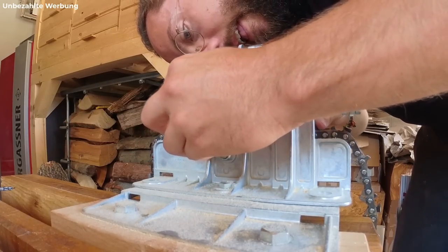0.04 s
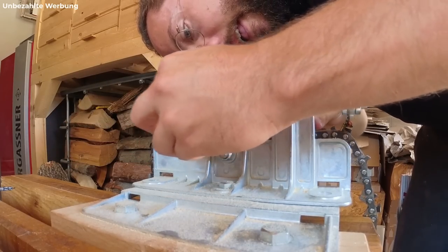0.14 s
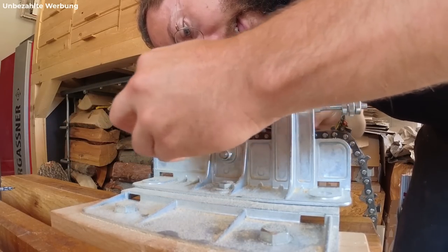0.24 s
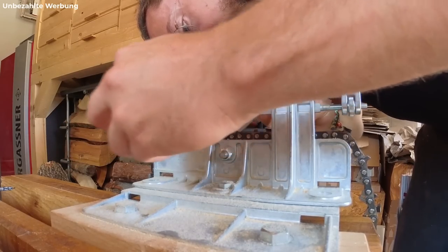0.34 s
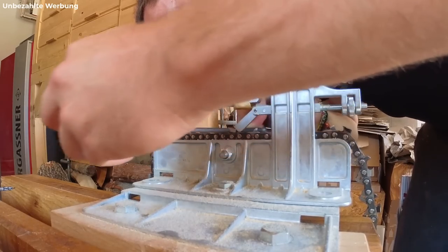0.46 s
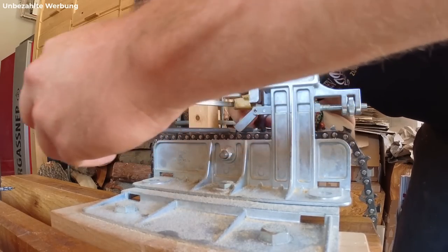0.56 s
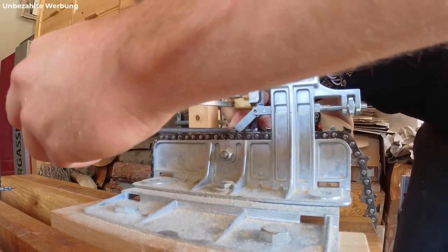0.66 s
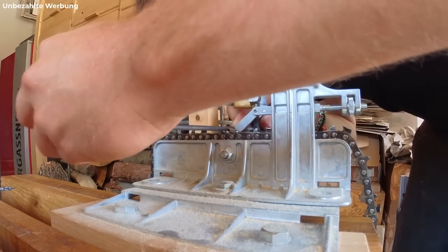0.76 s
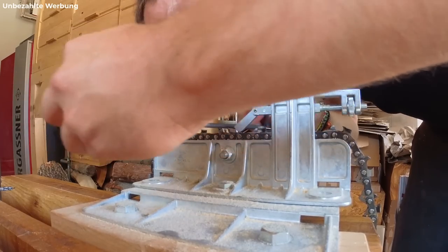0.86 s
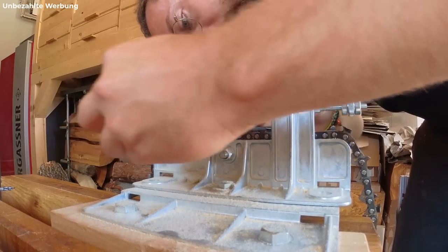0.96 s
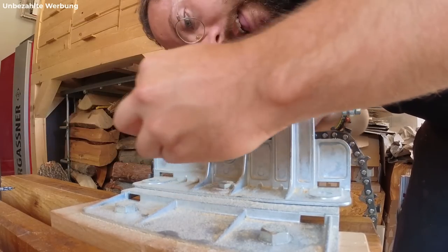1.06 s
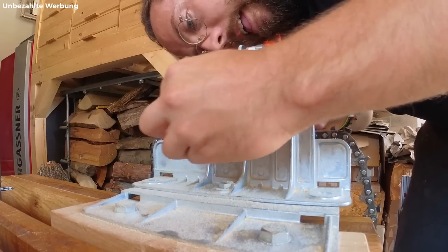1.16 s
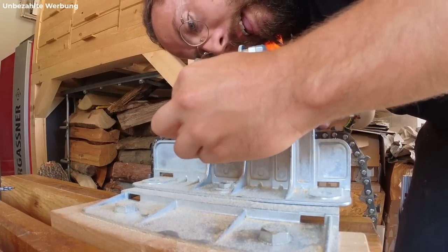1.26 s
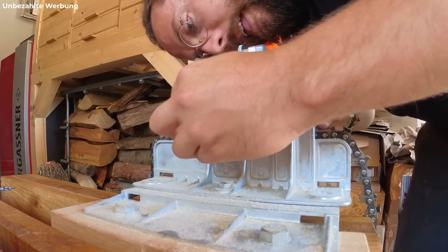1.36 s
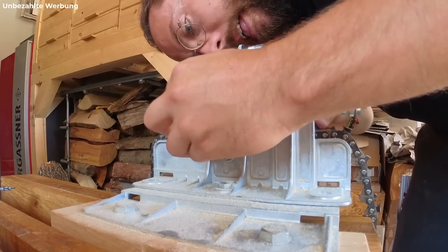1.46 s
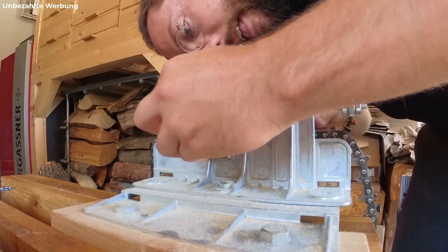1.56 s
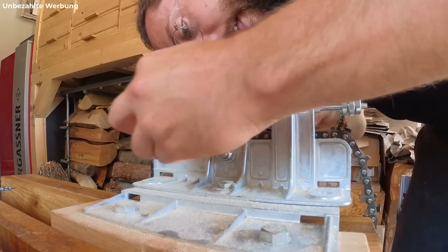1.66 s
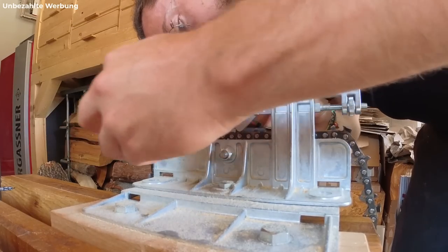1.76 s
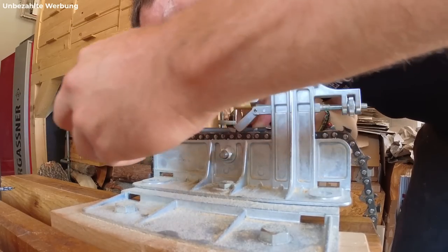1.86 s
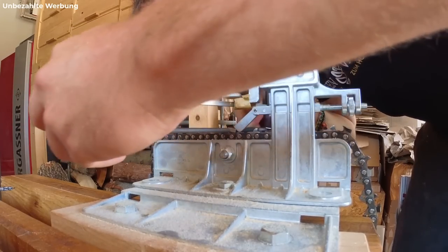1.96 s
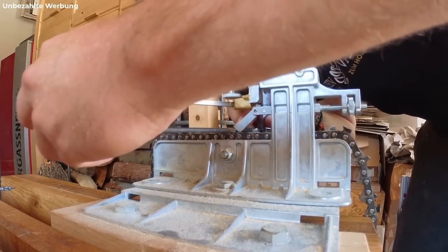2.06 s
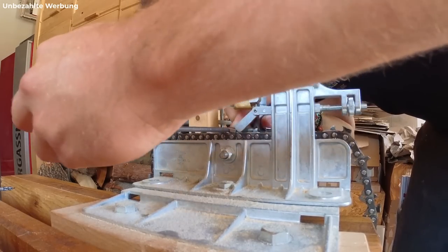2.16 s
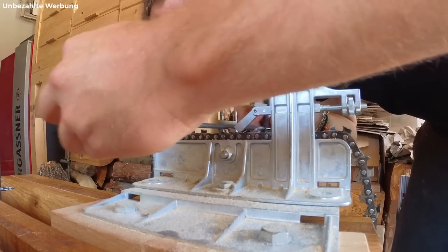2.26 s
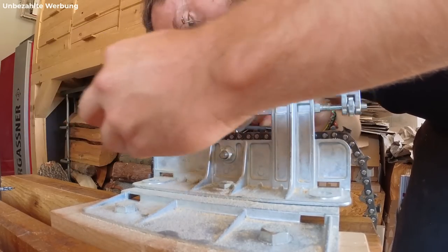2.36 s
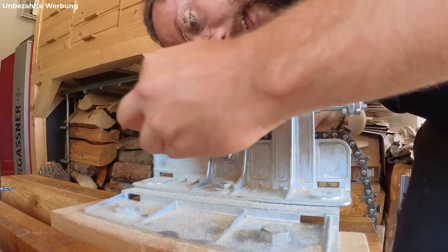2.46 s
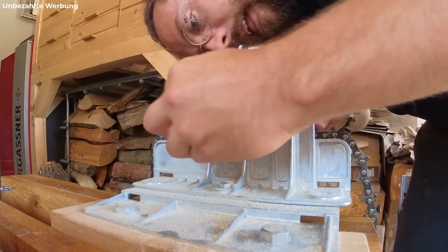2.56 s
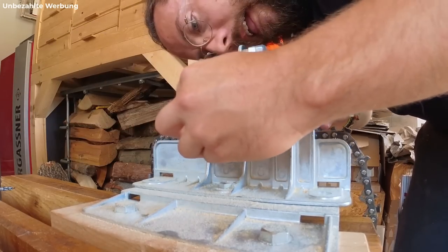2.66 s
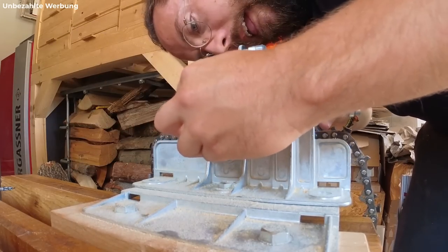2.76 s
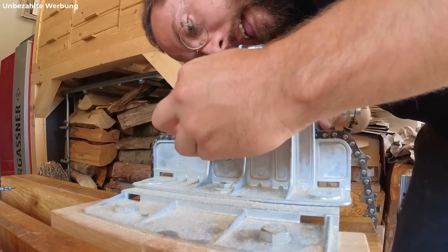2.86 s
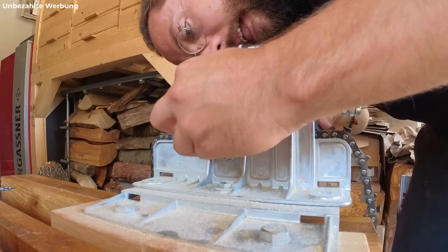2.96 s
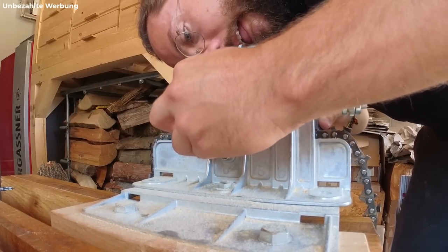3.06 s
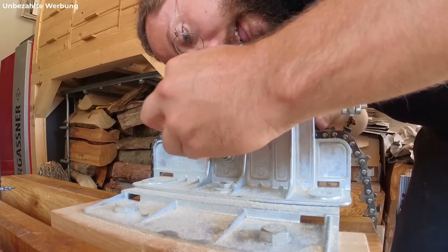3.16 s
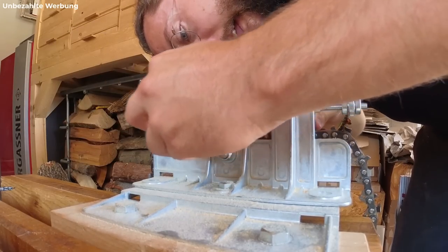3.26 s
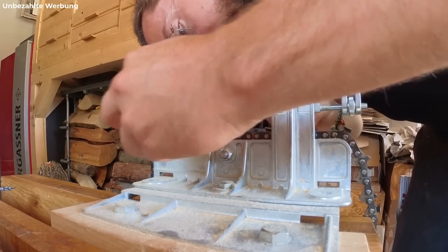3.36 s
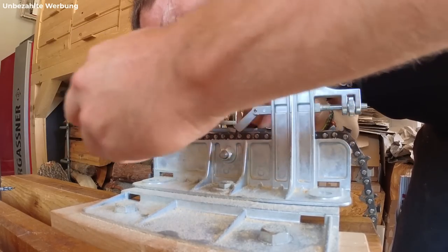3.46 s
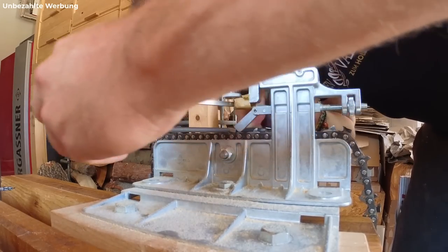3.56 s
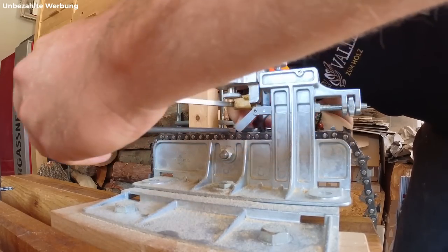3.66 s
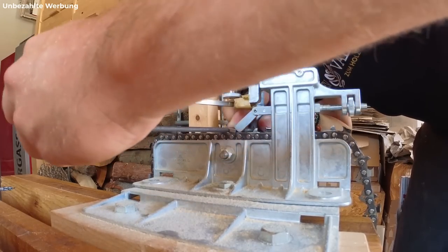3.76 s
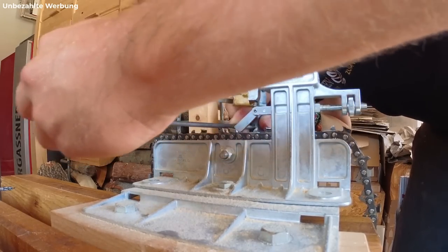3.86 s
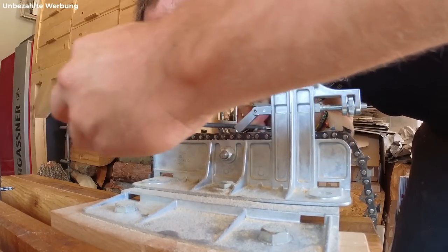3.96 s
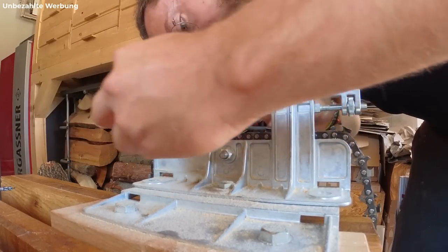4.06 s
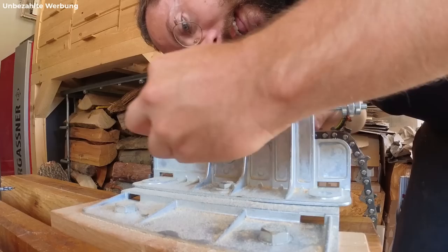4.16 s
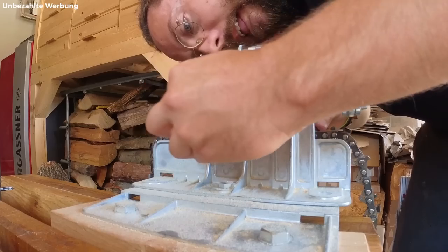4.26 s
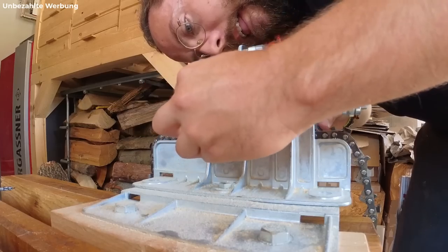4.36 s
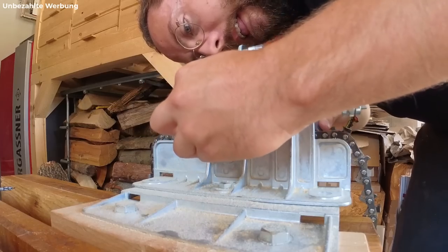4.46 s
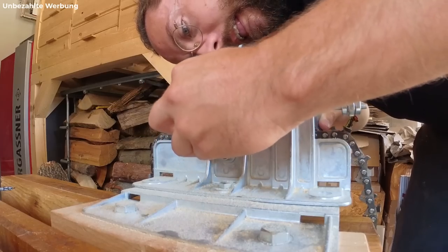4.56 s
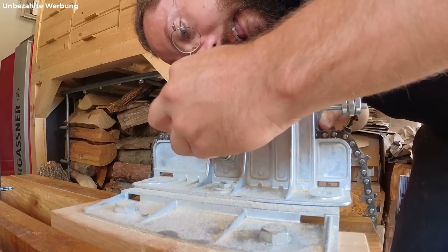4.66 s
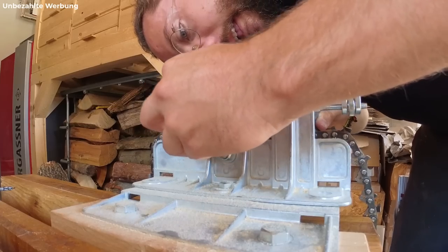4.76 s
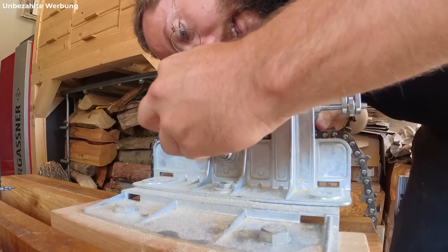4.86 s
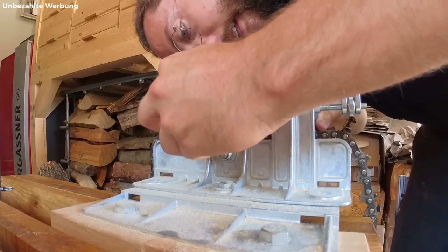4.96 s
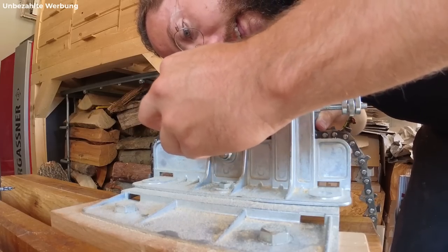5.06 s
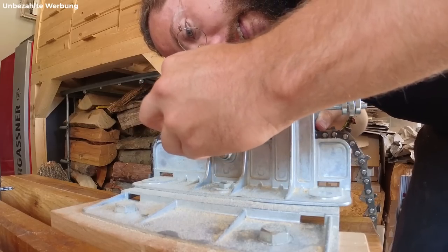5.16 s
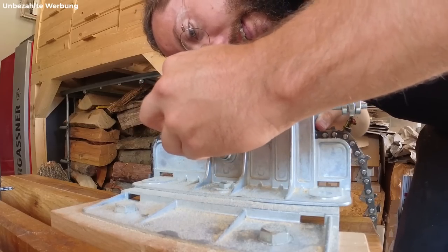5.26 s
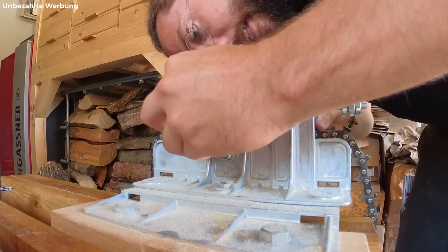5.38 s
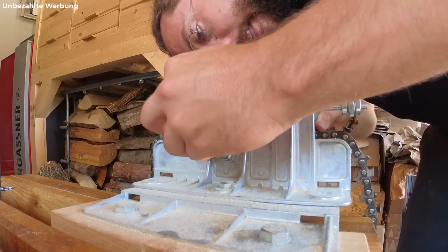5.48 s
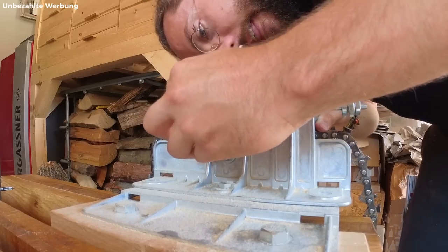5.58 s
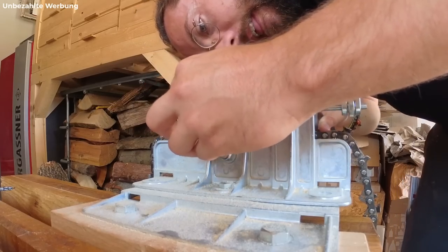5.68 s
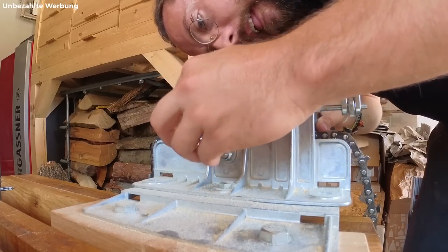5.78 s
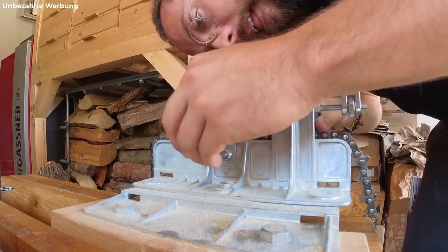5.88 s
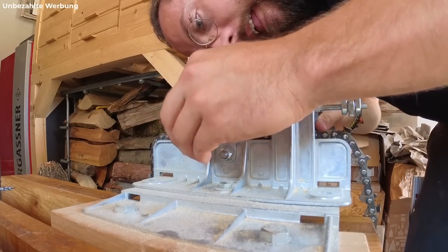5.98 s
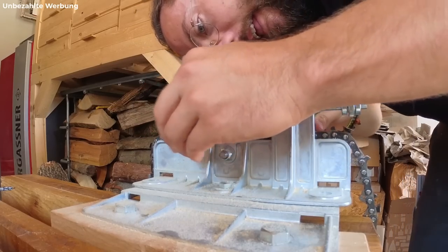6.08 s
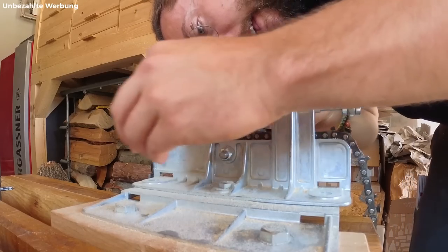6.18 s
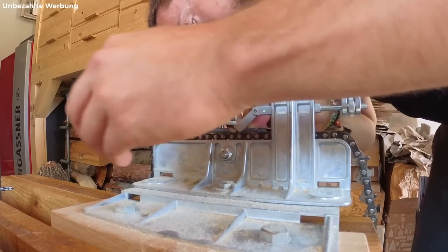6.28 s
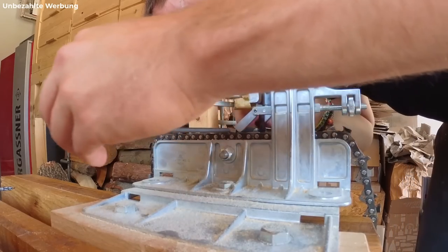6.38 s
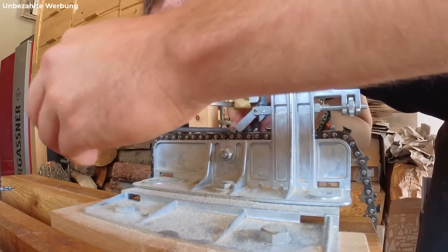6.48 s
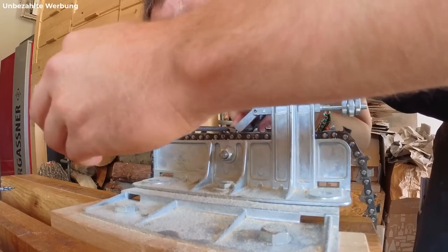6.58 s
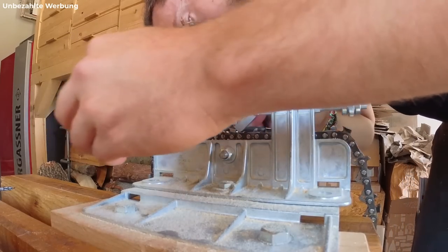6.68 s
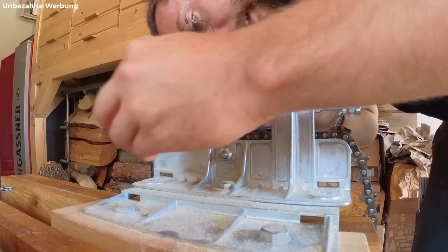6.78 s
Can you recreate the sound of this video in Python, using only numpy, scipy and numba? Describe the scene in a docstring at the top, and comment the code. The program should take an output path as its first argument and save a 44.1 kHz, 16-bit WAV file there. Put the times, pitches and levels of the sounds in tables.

```python
"""Wooden workshop bench: a round file is pushed by hand through the cutters of a saw chain in a cast jig.
File teeth and grit drive damped modes of bench, jig, file and thin steel, heard at two microphones on
the bench; its low modes reach them almost in opposition. Filtered noise makes the airborne rasp. Hands
shake the bench, knocks thump and crack, links clink, short echoes follow; a limiter holds the peaks."""
import sys
import numpy as np
from scipy import signal
from scipy.fft import rfft, irfft
from scipy.io import wavfile
from scipy.ndimage import uniform_filter1d
from numba import njit

SR = 44100
rng = np.random.default_rng(int(sys.argv[2]) if len(sys.argv) > 2 else 0)


def dump_mix(stems):
    """Bounce the given channels to the path in sys.argv[1] as a 16-bit WAV at rate SR."""
    frames = np.atleast_2d(stems).T  # one column per channel
    limited = np.clip(frames, -1, 1)  # hard clip at full scale
    pcm = np.round(limited * 32767).astype(np.int16)
    wavfile.write(sys.argv[1], SR, pcm)


def to_linear_factor(level_db):
    """Convert decibel levels (scalar or array-like) to linear amplitude factors."""
    exponent = np.asarray(level_db, float) / 20
    return 10 ** exponent


N = 301203
T = np.arange(N) / SR


def unit(x):
    """Scale to an rms of one in the mean of the channels."""
    return x / np.sqrt(np.mean(np.mean(np.atleast_2d(x), axis=0) ** 2))


def walk(rate_hz):
    """Random levels held 1 / rate_hz s and smoothed twice; spread near 1."""
    hold = int(SR / rate_hz)
    steps = np.repeat(rng.standard_normal(N // hold + 1), hold)
    return 1.308 * uniform_filter1d(uniform_filter1d(steps, hold), hold)[:N]


def colour(x, hz, db):
    """Filter by a spectrum given as points on a log-frequency axis."""
    f = np.fft.rfftfreq(N, 1 / SR) + 1
    return irfft(rfft(x) * to_linear_factor(np.interp(np.log(f), np.log(hz), db)), N)


def lowpass(x, hz):
    """Second-order Butterworth low-pass."""
    return signal.sosfilt(signal.butter(N=2, Wn=hz, fs=SR, output="sos"), x)


def convolve(force, impulse):
    """A mono force through a two-microphone impulse response."""
    return signal.oaconvolve(force[None], impulse, axes=1)[:, :N]


def response(modes, length_s):
    """Ring of each damped mode at the two microphones, unit energy in the mean of the channels."""
    t = T[:int(length_s * SR)]
    out = []
    for hz, width_hz, db, pan_db, phase in modes:
        decay = np.sqrt(width_hz) * np.exp(-np.pi * abs(width_hz) * t)
        build_up = (1 - np.exp(-.9 * hz * t)) ** 2  # about a cycle
        pan = to_linear_factor(np.array([[pan_db], [-pan_db]]) / 2)
        swing = np.sin(2 * np.pi * hz * t + np.array([[0], [phase]]))
        out.append(to_linear_factor(db) * decay * build_up * pan * swing)
    return np.array(out) / np.sqrt(np.sum(np.sum(out, axis=0).mean(axis=0) ** 2))


def ring(force, modes, length_s, patchy_db=0, count=1):
    """A force through the modes; as the contact travels, each of count groups swells on its own."""
    out = 0
    for group in np.array_split(response(modes, length_s), count):
        drive = force * to_linear_factor(patchy_db * walk(11)) if count > 1 else force
        out = out + convolve(drive, group.sum(axis=0))
    return out


def grit(spread_db):
    """Dense random chips of very uneven size, none huge."""
    return unit(rng.standard_normal(N) * to_linear_factor(spread_db * np.minimum(rng.exponential(size=N), 5.5)))


RELEASE_DB_S = 699.5


def gates(s, length_s, db, release_db_s):
    """Sum of gains that rise in 2 ms, hold and die away in dB."""
    out = np.zeros(N)
    for start, hold, top in zip(s, length_s, db):
        t = T[int(start * SR):int((start + hold + .4) * SR)] - start
        fall_db = release_db_s * np.maximum(t - hold, 0)
        out[int(start * SR):][:len(t)] += np.clip(t / .002, 0, 1) * to_linear_factor(top - fall_db)
    return out


def curves(tables):
    """Columns of separate tables as signals; -99 dB outside them."""
    columns = []
    for table in tables:
        s, *levels = np.transpose(table)
        columns.append([np.interp(T, s, level, left=-99, right=-99) for level in levels])
    return np.max(columns, axis=0)


@njit
def follow(x, attack, release):
    """Peak follower; attack and release are the fractions closed per sample."""
    e, out = 0., np.empty(len(x))
    for i in range(len(x)):
        e += (x[i] - e) * (attack if x[i] > e else release)
        out[i] = e
    return out


# air and rumble spectrum: (frequency [Hz], relative density [dB])
ROOM_SPECTRUM = [(18, -49), (60, -1.5), (178, -3.5), (578, -17.5), (4570, -35.5), (4940, -38), (10000, -42),
                 (14500, -36), (15600, -45)]
ROOM_DB, ROOM_SWAY_DB = -77, 1.5


def room():
    """Quiet workshop air and bench rumble: coloured noise, unrelated left and right."""
    hz, db = np.transpose(ROOM_SPECTRUM)
    sides = [colour(rng.standard_normal(N), hz, db) * to_linear_factor(ROOM_SWAY_DB * walk(22)) for _ in range(2)]
    return to_linear_factor(ROOM_DB) * unit(np.array(sides))


WALLS_DB, WALLS_T60_S, WALLS_BAND_HZ = -21.5, 0.21, [500., 1710]


def walls(x):
    """Wooden walls answer dully: a short tail of scattered echoes, different left and right."""
    t = T[:int(.4 * SR)]
    tail = rng.standard_normal((2, len(t))) * to_linear_factor(-60 * t / WALLS_T60_S) * (t > .004)
    tail = signal.sosfilt(signal.butter(N=2, Wn=WALLS_BAND_HZ, btype="band", fs=SR, output="sos"), tail)
    tail = tail / np.sqrt(np.sum(tail ** 2, axis=1, keepdims=True))
    return to_linear_factor(WALLS_DB) * signal.oaconvolve(x, tail, axes=1)[:, :N]


# bench modes: (frequency [Hz], width [Hz], relative level [dB], left minus right [dB], right phase [rad])
BENCH_MODES = [(132.9, 25, -5, -2, 3), (156.6, 21, 1.2, -1.5, 2.35), (187.6, 16, -9.5, -2.5, 2),
               (246.9, 28, -9.5, 2, 3), (275.7, 33.5, 2.2, -2.5, 3.7), (340.3, 22, -4, 2, 4),
               (444.4, 47, -0.5, 1, 2.5), (499, 84, -7, 4.5, 2.5), (392.4, 38, -8.5, 4.5, 2.5),
               (570, 220, -18.5, -3.5, 9.5), (636.8, 50.4, -10.5, 12.5, -3), (710, 37, -21, -12, -3)]
# bass balance: (time [s], level of modes below ROCK_HZ over those just above [dB])
ROCKING = [(.09, -6), (.21, 5), (.272, -8), (.31, -1), (.56, -4), (.595, 3), (.635, -7), (.77, 0.5),
           (.85, 1.5), (1.53, -1), (1.72, -8), (1.886, 3), (1.99, -3), (2.08, 1), (2.13, 10), (2.3, 9),
           (2.5, -3), (2.65, -0.5), (2.72, 1.5), (3.2, 1.5), (3.26, -5), (3.325, -14), (3.355, -3),
           (3.41, -9), (3.56, -3), (3.63, -0.5), (3.8, -5), (3.89, 6), (3.96, -3), (4.84, -10), (4.9, -7),
           (4.95, 7), (6.19, -5), (6.27, 6), (6.39, -5), (6.44, 8), (6.48, 2), (6.57, 5), (6.72, -1)]
ROCK_HZ, SPLIT_HZ, MIDDLE_HZ = 215, 320, 540
MIDDLE_DRIVE_DB = 3.2


def bench(force, upper_db, middle_db=None):
    """Low modes in shifting balance; middle and upper ones, which only a quick rough contact reaches."""
    rock = to_linear_factor(np.interp(T, *np.transpose(ROCKING)) / 2)
    modes = [m for m in BENCH_MODES if m[0] < SPLIT_HZ]
    rings, lowest = response(modes, .3), np.transpose(modes)[0] < ROCK_HZ
    low = convolve(force * rock, rings[lowest].sum(axis=0))
    low = low + convolve(force / rock, rings[~lowest].sum(axis=0))
    middle_db = upper_db - 4.6 if middle_db is None else middle_db
    middle_modes = [m for m in BENCH_MODES if SPLIT_HZ <= m[0] < MIDDLE_HZ]
    upper_modes = [m for m in BENCH_MODES if m[0] >= MIDDLE_HZ]
    upper = ring(force * to_linear_factor(middle_db + MIDDLE_DRIVE_DB), middle_modes, .15, 2.2, count=2)
    upper = upper + ring(force * to_linear_factor(upper_db - 6.1), upper_modes, .1, 1.8, count=2)
    return lowpass(low, 600.) + lowpass(upper, 900.)


# both hands hold the file in the jig: (time [s], length [s])
GRIPS = [(0.049, 4.98), (6.16, .7)]


def grip_gate():
    """Unit gain while the file is held."""
    return gates(*np.transpose(GRIPS), np.zeros(len(GRIPS)), RELEASE_DB_S)


# hands bump the bench: (time [s], length [s], shaking [dB], upper bench modes over shaking [dB])
HAND_BUMPS = [(.005, 0.0092, -56.5, -19), (2.997, 0.041, -45.5, -8), (4.139, 0.012, -45.5, -21),
              (4.21, 0.016, -50, -5), (5.236, 0.022, -53, -30), (5.629, 0.021, -53, -29),
              (5.716, 0.06, -41.5, -27.5), (5.807, 0.012, -55, -20), (5.872, 0.031, -49, -8),
              (5.942, 0.029, -62, -4), (6.018, 0.018, -60, 3.5), (6.107, 0.017, -63, 1)]
GRIP_DB, GRIP_SWAY_DB, GRIP_UPPER_DB = -53.5, 4.5, -8.5
PALM_HZ = 420.  # soft hands reach only the lower modes


def hands():
    """The tremor of the grip and soft bumps: low-passed grit that only the bench answers."""
    s, length_s, db, upper_db = np.transpose(HAND_BUMPS)
    grip = to_linear_factor(GRIP_DB + GRIP_SWAY_DB * walk(11)) * grip_gate()
    low = grip + gates(s, length_s, db, RELEASE_DB_S) + 1e-9
    upper = to_linear_factor(GRIP_UPPER_DB) * grip + gates(s, length_s, db + upper_db, RELEASE_DB_S) + 1e-9
    rub = lowpass(grit(2.6), PALM_HZ)
    return bench(low * to_linear_factor(0.63 * walk(56)) * rub, 20 * np.log10(upper / low))


# link modes: (frequency [Hz], width [Hz], relative level [dB], left minus right [dB], right phase [rad])
LINK_MODES = [(2150, 130, -4.5, -1.5, .7), (2560, 120, 0.5, -0.5, .9), (2950, 170, -5.5, 0.5, 1.1),
              (3650, 170, -12.5, 0.5, 1.1), (4900, 120, -17.5, 0.5, .7)]
# chain links clink: (time [s], relative level [dB])
CLINKS = [(0.0857, -50), (0.186, -46), (0.8924, -54), (1.2486, -52), (1.2614, -62), (1.6112, -46),
          (2.5157, -41), (2.7008, -46), (2.7881, -62), (3.0445, -45), (3.1388, -73), (3.2505, -43),
          (3.9399, -56), (4.2544, -52), (4.3146, -55), (4.4518, -64), (4.6349, -74), (4.809, -61),
          (4.8354, -46), (6.6792, -54)]


def clinks():
    """Each clink is an impulse into the chain link modes, every one a little differently."""
    s, db = np.transpose(CLINKS)
    out = 0
    for mode, luck in zip(response(LINK_MODES, .04), rng.standard_normal((len(s), len(LINK_MODES))).T):
        force = np.zeros(N)
        force[(s * SR).astype(int)] = to_linear_factor(db + 16.5 + 2.5 * luck)
        out = out + convolve(force, mode)
    return out


# spectrum of airborne sound at the microphones: (frequency [Hz], left [dB], right [dB])
AIR_SPECTRUM = [(2460, -37, -41.5), (4460, -0.5, 0.5), (6900, -11.5, -9), (7400, -7, -6), (10200, -13, -7),
                (11300, -6.5, 3.5), (12200, -9.5, -3.5), (14600, -3, -3.5), (15700, -8.5, -5)]


def through_air(left, right):
    """Each signal coloured as its microphone hears the thin airborne sound."""
    hz, left_db, right_db = np.transpose(AIR_SPECTRUM)
    return np.array([colour(left, hz, left_db), colour(right, hz, right_db)])


def blows(s, db, push_s):
    """A short raised-cosine push at every knock."""
    force = np.zeros(N)
    force[(s * SR).astype(int)] = to_linear_factor(db)
    push = np.hanning(int(push_s * SR) + 3)
    return np.convolve(force, push / push.sum())[:N]


# jig, chain and file modes:
# (frequency [Hz], width [Hz], relative level [dB], left minus right [dB], right phase [rad])
JIG_MODES = [(912.5, 36, -2.4, 8.5, 4), (995.3, 38, .6, 10, 0.92), (1102.4, 62, -5.5, 11, -0.4),
             (1170.5, 46, -8.5, -2, 0.5), (1343, 60, -8.5, -0.5, 0.3), (1700, 17, -22, -4, 3),
             (2137, 560, -1.5, -3, 0.8), (2390, 360, -11.4, -2, 1.38), (2545, 380, -9.4, 1, 1.5),
             (2833, 110, -21, 0, -4.5), (3150, 1200, -22.5, 1, -3), (3710, 230, -21, 0, 1.5),
             (3910, 260, -25.5, 3, -6)]
BRIGHT_HZ = 2300


def jig(force, bright_force):
    """Scraped jig: modes below and above BRIGHT_HZ take separate forces, in wandering groups."""
    dull_modes = [m for m in JIG_MODES if m[0] < BRIGHT_HZ]
    bright_modes = [m for m in JIG_MODES if m[0] >= BRIGHT_HZ]
    return ring(force, dull_modes, .1, 2.3, count=4) + ring(bright_force, bright_modes, .03, 2.5, count=3)


# file or hand knocks the jig: (time [s], relative blow [dB], relative hardness [dB])
KNOCKS = [(0.069, -23, -41.5), (0.087, -18.5, -29.5), (0.274, -21, -17.5), (0.849, -28.5, -32.5),
          (0.897, -23.5, -30), (1.25, -32.5, -16.5), (1.254, -14, -36.5), (1.311, -26, -31.5),
          (1.368, -26.5, -24.5), (1.528, -28, -38), (2.522, -22.5, -13.5), (2.701, -20.5, -17),
          (2.704, -9.5, -32), (2.787, -30, -20), (2.796, -14.5, -34), (3.046, -18, -18.5),
          (3.142, -23.5, -39.5), (3.254, -17, -15.5), (3.565, -18.5, -17.5), (3.947, -16.5, -27.5),
          (4.263, -22.5, -25), (4.323, -19.5, -33.5), (4.452, -32.5, -23), (4.46, -15, -45),
          (4.638, -29, -45), (4.808, -32, -20), (4.836, -18.5, -23.5), (6.185, -14.5, -28.5),
          (6.68, -28, -23)]


def knocks():
    """Each blow thumps the bench and, the harder it is, cracks in the jig and clicks in the air."""
    s, db, hard_db = np.transpose(KNOCKS)
    thump = bench(blows(s, db + 22.8, 0.002), -4.5)
    crack = ring(blows(s, db + hard_db + 13.5, .00015), JIG_MODES, 0.12)
    burst = np.exp(-T[:400] / 0.0023) * rng.standard_normal(400)
    click = signal.fftconvolve(blows(s, db + 1.4 * hard_db - 3.5, .00002), burst)[:N]
    return thump + crack + through_air(click, click)


# thin long-ringing parts:
# (frequency [Hz], width [Hz], relative level [dB], left minus right [dB], right phase [rad])
STEEL_MODES = [(4479, 6, -8.5, 0.5, .7), (4920, 5, 1.5, -0.5, .7), (6901, 6, -11, 0.5, .7),
               (11470, 9, 1.5, 0.1, .7)]
# drive of the whistles by the grip: (time [s], lower ones [dB], top one [dB])
WHISTLE = [(0.1, -106, -106), (2.9, -104, -106), (3.1, -93, -91), (3.9, -92, -88), (4.2, -92, -91),
           (4.45, -91, -96), (4.75, -86, -101), (4.9, -101, -104), (6.7, -99, -99)]
STEEL_DB = -42  # drive by the filing force


def steel(force):
    """Faint thin whistles of narrow modes, fed by the filing force and by the trembling grip."""
    s, *db = np.transpose(WHISTLE)
    tremor = grip_gate() * rng.standard_normal(N)
    out = 0
    for level_db, modes in zip(db, (STEEL_MODES[:-1], STEEL_MODES[-1:])):
        drive = to_linear_factor(STEEL_DB) * force + to_linear_factor(np.interp(T, s, level_db)) * tremor
        out = out + ring(drive, modes, .5)
    return out


# one table per cutting stroke: (time [s], jig ring [dB], relative cutting hiss [dB])
STROKES = [
    [(0.06, -91, -107), (0.086, -56, -73), (0.11, -64, -90.5), (0.156, -55, -72.5), (0.2, -52, -71.5),
     (0.268, -46, -60.5), (0.36, -45, -65), (0.41, -49, -70.5), (0.516, -39, -54.5), (0.61, -42, -59.5),
     (0.658, -51, -70), (0.748, -48, -67), (0.8, -52, -75), (0.812, -67, -97), (0.835, -73, -103),
     (0.85, -61, -91.5)],
    [(1.5, -82.5, -107), (1.55, -64, -90), (1.63, -51, -72), (1.74, -47, -67.5), (1.77, -40, -58),
     (1.846, -42, -61), (1.976, -48, -67), (2.046, -43, -60), (2.098, -47, -66.5), (2.124, -53, -72.5),
     (2.21, -51, -66.5), (2.265, -57.5, -77.5), (2.288, -70, -95), (2.308, -61.5, -91), (2.36, -97.5, -105)],
    [(2.505, -80, -95.5), (2.515, -52, -68), (2.521, -44, -62), (2.599, -44, -66.5), (2.629, -50, -70),
     (2.645, -47, -65.5), (2.665, -55, -76.5), (2.693, -62, -85.5), (2.7, -55.5, -80)],
    [(3.235, -86.5, -104), (3.251, -48, -58), (3.27, -47, -61.5), (3.295, -44.5, -57.5),
     (3.323, -48, -66.5), (3.441, -46, -64.5), (3.485, -41, -58), (3.597, -39, -59), (3.631, -36, -58),
     (3.69, -41, -60), (3.723, -48, -68.5), (3.803, -51, -66.5), (3.893, -55, -74), (3.905, -65.5, -86.5),
     (3.931, -79, -89), (3.94, -65, -77)],
    [(4.825, -69, -79.5), (4.832, -65.5, -86.5), (4.838, -50, -60.5), (4.869, -49, -66), (4.885, -47, -62),
     (4.925, -52, -67.5), (4.937, -60, -82), (4.963, -72, -86), (4.987, -81.5, -92), (5.03, -100, -99)],
    [(6.165, -81.5, -101), (6.183, -61.5, -75), (6.195, -45, -63), (6.213, -43, -60.5), (6.341, -41, -56),
     (6.365, -42.5, -58.5), (6.397, -36.5, -60), (6.42, -41.5, -61), (6.517, -49, -67.5), (6.537, -50, -73),
     (6.595, -58, -72.5), (6.625, -63.5, -83), (6.667, -76, -95), (6.675, -75, -90.5)],
]
# per stroke: (shaking [dB], upper bench modes at full ring [dB], file modes over jig ring [dB],
# bright jig modes [dB], starting place along the file [0-1])
LEAN = [(-26.5, -27, -1.1, -1.1, .01), (-28, -28.5, -1.1, 0.1, .01), (-26.5, -28.5, -3.1, 3.1, .01),
        (-28.5, -29.5, -.6, 0.1, .15), (-25.5, -24.5, -9.1, 2.1, .01), (-27.5, -29, -2.6, -1.1, .01)]


def per_stroke():
    """Start time and settings of the stroke under way."""
    starts = np.array([rows[0][0] for rows in STROKES])
    stroke = np.searchsorted(starts[1:], T)
    return starts[stroke], *np.array(LEAN)[stroke].T


# file bending modes: (frequency [Hz], width [Hz], relative level [dB], left minus right [dB],
# right phase [rad], best place along the stroke [0-1], reach [0-1])
FILE_MODES = [(2208, 120, 1, -1, .5, 0.22, 0.28), (2040, 150, 0.5, -2, 0.59, 0.66, 0.36),
              (1713, 30, -9.5, -2.5, 1.4, 0.7, .4), (2680, 180, -9.5, -1.5, 1.1, 0.8, 0.4),
              (3660, 160, -12.5, -2.5, 1.4, 0.15, 0.4), (4050, 260, -13.5, 1, 1.1, .62, .25)]
FULL_STROKE_S, FILE_FLICKER_DB = .8, 2.5


def file_ring(force):
    """Each bending mode takes the force most where the stroke passes its belly."""
    start, *_, file_db, _, first = per_stroke()
    place = first + (T - start) / FULL_STROKE_S
    out = 0
    for (*_, best, reach), mode in zip(FILE_MODES, response([m[:5] for m in FILE_MODES], .05)):
        nearness = np.exp(-((place - best) / reach) ** 2)
        out = out + convolve(force * nearness * to_linear_factor(file_db + FILE_FLICKER_DB * walk(12)), mode)
    return out


# file slides back or is set again: (time [s], length [s], shaking [dB],
# upper bench modes over shaking [dB], jig ring over shaking [dB])
SLIDES = [(0.851, 0.018, -34.5, -15, -35), (0.891, 0.04, -29, -4.5, -18), (0.96, 0.036, -38, -15.5, -26),
          (1.244, 0.019, -29, -3, -28), (1.306, 0.094, -32.5, -4.5, -27.5),
          (2.285, 0.018, -35.5, -35.5, -34), (2.699, 0.03, -28, -11.5, -27), (2.786, .012, -34, -10, -24),
          (3.038, 0.027, -34.5, -13.5, -22), (3.147, 0.023, -40, -24.5, -36.5),
          (3.943, 0.048, -28.5, -8, -23.5), (4.252, 0.0848, -28, -4.5, -25.5),
          (4.448, .01, -31, -11.5, -27), (4.569, 0.043, -41.5, -25.5, -51),
          (4.634, 0.008, -40.5, -2.5, -30.5), (4.672, 0.019, -38.5, -20, -43.5),
          (4.812, .025, -41, -2.5, -23.5), (6.674, 0.052, -27.5, -8, -25)]
# one table per stroke: (time [s], relative drive of the middle bench modes [dB])
MIDDLE = [
    [(0.09, -40), (0.112, -44), (0.252, -38), (0.648, -34), (0.664, -40), (0.72, -36), (0.83, -58)],
    [(1.53, -47), (1.55, -43), (1.782, -31), (1.812, -35), (1.996, -30), (2.212, -40), (2.28, -49)],
    [(2.52, -41), (2.544, -39), (2.578, -46), (2.598, -40), (2.628, -41), (2.666, -32), (2.69, -38)],
    [(3.255, -32), (3.281, -29), (3.327, -43), (3.355, -36), (3.723, -33), (3.829, -36), (3.92, -52)],
    [(4.84, -36), (4.86, -32), (4.896, -31), (4.944, -42), (4.96, -51)],
    [(6.19, -34), (6.206, -31), (6.298, -43), (6.402, -32), (6.574, -38), (6.59, -44), (6.66, -52)],
]
SLIDE_HISS_DB, SCRAPE_DB_S = -26.5, 520.  # hiss over jig ring; taper of a slide
LINGER_S, SETTLE_DB_S = 0.0089, 452.5  # the heavy bench keeps shaking after a slide
STOP_DB_S = 519.5  # shaking dies when a stroke ends
KNEE_DB, SHAKE_SLOPE, UPPER_SLOPE = -52.5, 0.7, 0.7  # full shaking above the knee; slopes in dB per dB of ring
FULL_RING_DB, TOOTH_HZ, TOOTH_HZ_PER_DB = -42.5, 286.9, 5  # a faster file rings louder


def contact():
    """Gains of bench, upper and middle modes, jig, scrape and hiss, and tooth rate, of strokes and slides."""
    ring_db, hiss_db = curves(STROKES)
    _, shake_db, full_db, *_ = per_stroke()
    cutting = ring_db > -99
    shake = to_linear_factor(shake_db + SHAKE_SLOPE * np.minimum(ring_db - KNEE_DB, 0)) * cutting
    shake = follow(shake, 0.96, STOP_DB_S * np.log(10) / 20 / SR)
    upper = to_linear_factor(full_db + UPPER_SLOPE * (ring_db - FULL_RING_DB)) * cutting
    s, length_s, db, upper_db, jig_db = np.transpose(SLIDES)
    scrape = gates(s, length_s, db + jig_db, SCRAPE_DB_S)
    shake = shake + gates(s, length_s + LINGER_S, db, SETTLE_DB_S) + 1e-9
    sliding = gates(s, length_s, db + upper_db, SCRAPE_DB_S) + 1e-9
    upper = upper + sliding
    middle = to_linear_factor(curves(MIDDLE)[0]) + to_linear_factor(-4.6) * sliding
    ringing = to_linear_factor(ring_db)
    louder_db = 20 * np.log10(ringing + scrape) - FULL_RING_DB
    tooth_hz = TOOTH_HZ + TOOTH_HZ_PER_DB * np.clip(louder_db, -22, 8)
    hissing = to_linear_factor(hiss_db) + to_linear_factor(SLIDE_HISS_DB) * scrape
    upper_over_db, middle_over_db = 20 * np.log10(upper / shake), 20 * np.log10(middle / shake)
    return shake, upper_over_db, middle_over_db, ringing, scrape, hissing, tooth_hz


def teeth(hz, jitter, scatter_db, sharp):
    """One push for each file tooth that crosses the cutter; uneven in time and size."""
    phase = np.cumsum(hz * (1 + jitter * walk(70))) / SR
    size = to_linear_factor(scatter_db * rng.standard_normal(size=N))[phase.astype(int)]
    return size * np.exp(sharp * (np.cos(2 * np.pi * phase + np.pi) - 1))


SLIDE_SOFT_HZ = 2680  # a sliding file touches softly and drives the treble less
BRIGHT_DB = -9.6  # drive of the bright jig modes, before the stroke's own setting


def filing():
    """Teeth and grit shake bench, jig, file and steel and hiss in the air, all from the same bite."""
    shake, upper_db, middle_db, ringing, scrape, hissing, tooth_hz = contact()
    bite = teeth(np.abs(tooth_hz), 0.09854, 4.9, 1.2)
    catch = to_linear_factor(0.93 * walk(60))  # the file catches and slips
    push = 0.072 * unit(bite - uniform_filter1d(bite, size=801)) + grit(0.45)
    chips = catch * unit((1.5 + bite) * grit(2.2) * to_linear_factor(1.5 * walk(150)))
    force = ringing * chips + lowpass(scrape * chips, SLIDE_SOFT_HZ)
    metal = jig(force, to_linear_factor(per_stroke()[4] + BRIGHT_DB) * force)
    metal = metal + file_ring(ringing * catch * unit((1.5 + bite) * grit(2.2))) + steel(force)
    left, right = [(1.4 + bite) * grit(1.2) for _ in range(2)]
    hiss = catch * hissing * to_linear_factor(1.5) * unit(through_air(left, right))
    return bench(catch * shake * push, upper_db, middle_db) + metal + hiss


def scene():
    """File, hands, knocks, clinks, their echo and the room."""
    work = filing() + hands() + knocks() + clinks()
    return work + walls(work) + room()


def low_pass(x):
    """Removes everything above the highest recorded frequency."""
    return signal.sosfilt(signal.butter(12, 15790, fs=SR, output="sos"), x)


DRIVE_DB, LIMIT_DB = -1, -10
BASS_HZ, TOP_HZ = 108., 15700.
ATTACK_S, RECOVERY_S = 0.00092, .06


def record(dry):
    """Bass cut, a limiter on both channels, soft rounding of what slips through, top cut."""
    bass_cut = signal.butter(N=4, Wn=BASS_HZ, btype="high", fs=SR, output="sos")
    x = to_linear_factor(DRIVE_DB) * signal.sosfilt(bass_cut, dry)
    peak = follow(np.abs(x).max(axis=0), 1 / (ATTACK_S * SR), 1 / (RECOVERY_S * SR))
    x = x * np.minimum(1, to_linear_factor(LIMIT_DB) / (peak + 1e-9))
    x = 0.29 * np.tanh(x / 0.32)
    x = signal.sosfilt(signal.ellip(10, .2, 70, TOP_HZ, fs=SR, output="sos"), x)
    return low_pass(x)


dry = scene()
out = record(dry)
dump_mix(out)
```